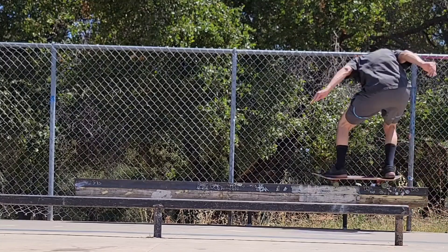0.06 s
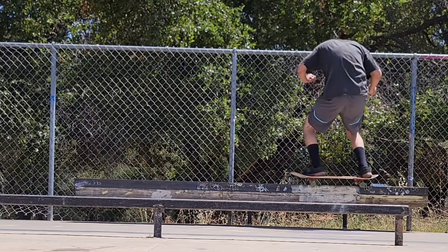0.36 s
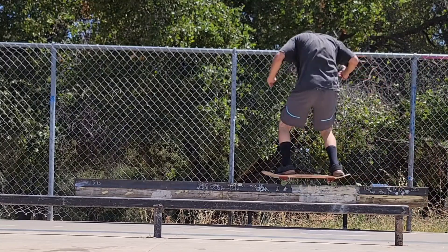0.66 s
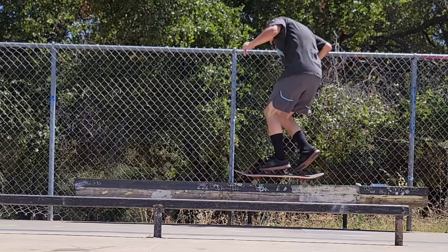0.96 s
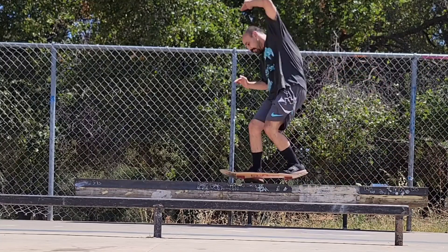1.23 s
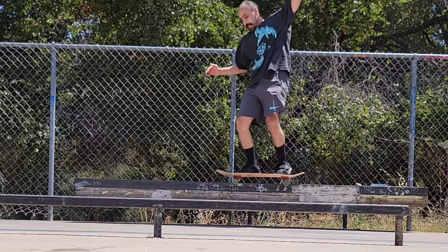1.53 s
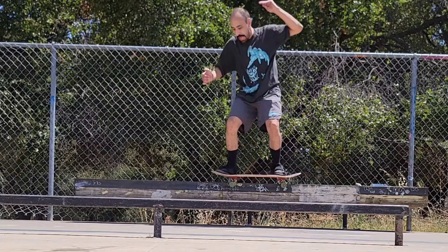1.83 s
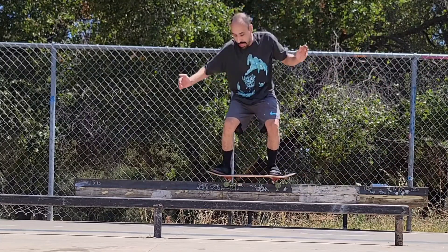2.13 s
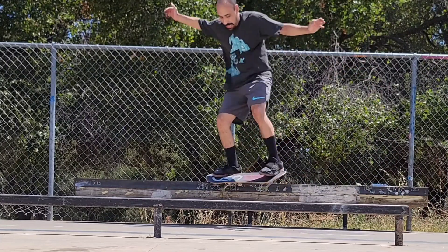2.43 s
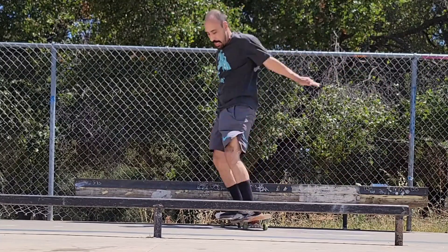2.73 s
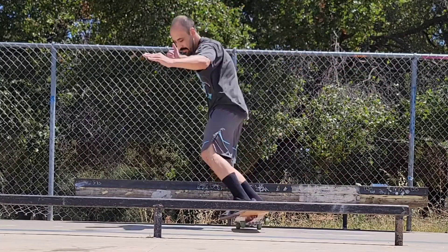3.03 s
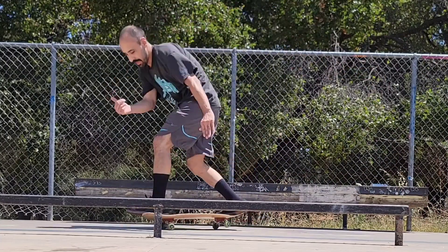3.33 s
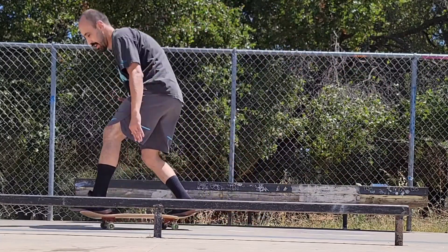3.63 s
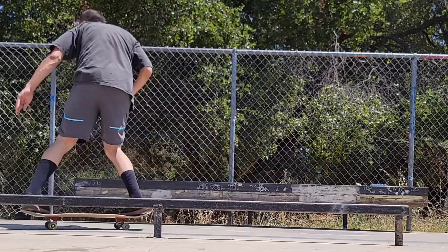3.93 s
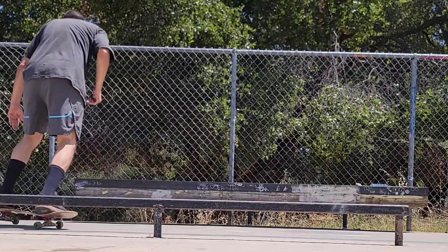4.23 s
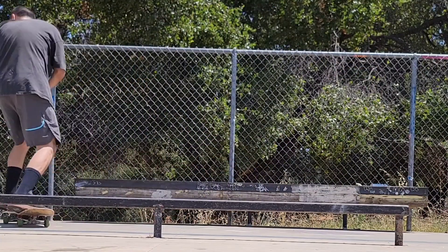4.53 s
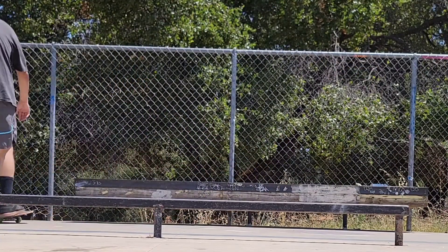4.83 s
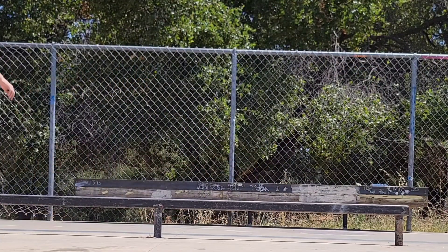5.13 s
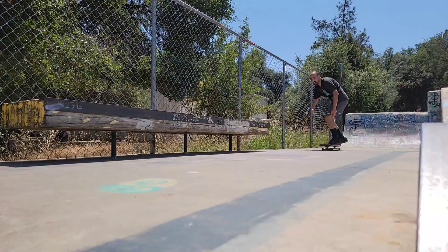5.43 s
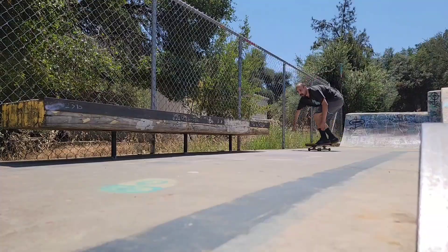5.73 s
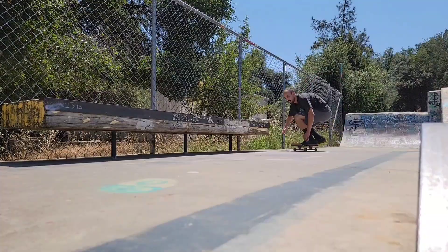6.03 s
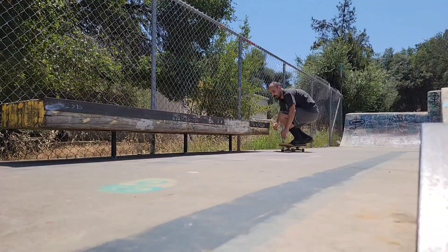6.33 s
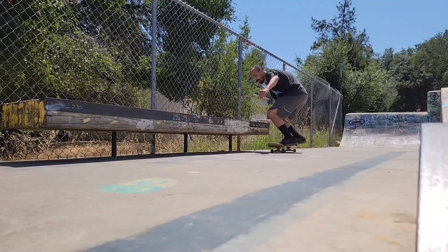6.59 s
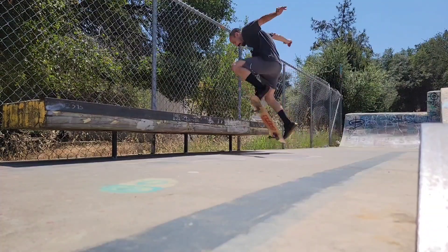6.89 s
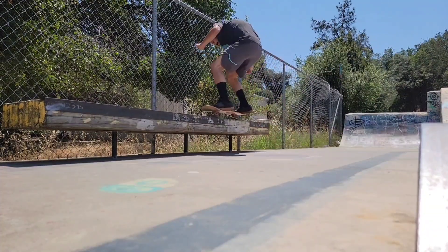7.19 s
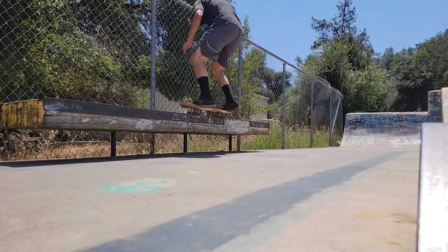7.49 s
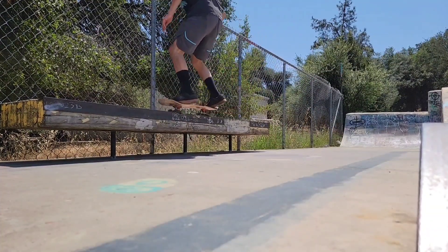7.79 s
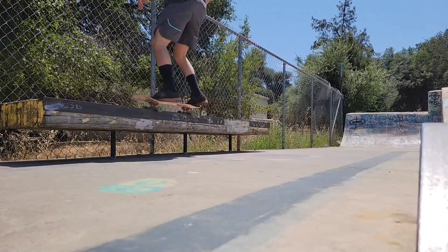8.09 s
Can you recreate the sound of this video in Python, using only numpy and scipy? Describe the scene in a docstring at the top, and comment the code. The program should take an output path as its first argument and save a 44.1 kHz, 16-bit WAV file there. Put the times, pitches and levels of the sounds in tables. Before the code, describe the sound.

A skateboard hits a steel rail with a sharp, ringing clack right at the start. Until about 2.4 seconds it balances there, with scattered knocks of wood and metal, short scrapes and a faint shoe squeak near 2 seconds. The tail slaps dryly around 2.5 seconds and the board clatters loudly onto concrete at 2.6. The wheels roll off to the left until about 5.3 seconds, their rumble turning raspier in the turns, with a few light knocks. From 5.4 seconds wheels roll up again, fairly quietly. The tail pops sharply at 6.8, and at 7 seconds the board lands on the rail with loud clacks and a hollow boom. It slides roughly along the steel toward the microphone, with a knock at 7.8 and more clacks just after 8 seconds. The open skatepark gives the hits a short, dull echo over a faint, steady low rumble.

```python
"""First a skateboarder balances on a steel rail: knocks and scrapes ring the wooden deck and the steel,
and a shoe squeaks. Next the tail slaps with a dry clack, he drops to the concrete and rolls off to the
left, the wheels' rumble brightening as he leans into turns. Then the scene changes: wheels roll up to
the rail, he pops the tail, lands with a boom and slides along the steel towards the microphone.
All along, hard blows clack, soft ones thump, and the open park answers briefly over its low rumble."""
import sys
import numpy as np
from scipy import signal
from scipy.fft import rfft, irfft, next_fast_len
from scipy.io import wavfile
from scipy.ndimage import map_coordinates

SR = 44100
rng = np.random.default_rng(int(sys.argv[2]) if len(sys.argv) > 2 else 0)


def output_pcm(signal):
    """Save a mono or channel-first signal as 16-bit PCM at the path in sys.argv[1].

    Samples are clipped to [-1, 1] before scaling.
    """
    pcm = np.clip(np.atleast_2d(signal).T, -1, 1) * 32767
    wavfile.write(sys.argv[1], SR, np.round(pcm).astype(np.int16))


N = 359415
RING_SIZE = SR // 2  # samples in one short sound
TIME, RING_TIME = np.arange(N) / SR, np.arange(RING_SIZE) / SR

# Blows of tail, trucks (axles) and wheels; t60 is the time a sound takes to fall by 60 dB:
# t/s, strength/dB, hardness/dB, grit/dB, rattle t60/s, thump f/Hz, knock f/Hz, clack f/Hz
BLOWS = [(0.0227, -16, 8.5, -16, 0.17, 303, 600, 3430), (0.042, -27, -10.5, -9, 0.035, 210.5, 504, 3480),
         (0.102, -29.5, 1, -29, 0.056, 174, 1170, 1610), (0.879, -34, 5.5, -27, 0.12, 177, 580, 1850),
         (0.919, -32.5, 10, -26, 0.2, 173, 1120, 2830), (0.925, -53, -14, -25, 0.05, 159, 500, 3450),
         (1.055, -32, -5, -24, 0.094, 300, 525, 3460), (1.096, -39.5, 2.5, -30, 0.018, 128, 592, 1710),
         (1.164, -50.5, 7, -13, 0.026, 200, 600, 4330), (1.635, -30.5, -2.5, -27, 0.11, 176, 547, 3500),
         (1.899, -39, 1.5, -42, 0.097, 164, 550, 3360), (2.255, -47.5, -13, -29, 0.044, 178, 550, 3450),
         (2.587, -31.5, 8.5, -40, 0.033, 169, 670, 2490), (2.599, -17, 3.5, -28, 0.03, 170, 750, 2030),
         (2.611, -27.5, -1, -19, 0.041, 200, 754, 1700), (2.6193, -20.5, -2, -21, 0.1, 234, 726, 1720),
         (2.652, -23, -1.5, -15.5, 0.097, 298, 490, 3200), (2.657, -15.5, -3, -22.5, 0.065, 238, 720, 1800),
         (2.682, -26.5, -5.5, -20, 0.033, 230, 594, 1750), (2.731, -38.5, -4.5, -40, 0.023, 200, 970, 1720),
         (2.933, -35, -1.5, -18, 0.079, 293, 815, 1770), (3.103, -29.5, 2, -10, 0.11, 290, 770, 2100),
         (3.445, -59.5, 4.5, -8.5, 0.02, 250, 800, 3620), (4.249, -38.5, 0, -14, 0.024, 213, 656, 1900),
         (5.029, -35, -4.5, -33.5, 0.021, 130, 554, 3140), (6.811, -31, -7, -18, 0.075, 211, 710, 1900),
         (6.993, -21, -3, -21, 0.048, 208, 830, 1680), (7.0117, -16, -6, -19, 0.09, 235, 480, 1770),
         (7.031, -15.5, 1.5, -7.5, 0.16, 240, 702, 1670), (7.058, -14.5, 1, -18.5, 0.055, 256, 980, 1920),
         (7.2373, -31, -0.5, -19.5, 0.073, 219, 1080, 4150), (7.803, -26.5, 2, -17, 0.1, 230, 1070, 3550),
         (8.058, -26, 2, -10.5, 0.14, 206, 794, 4100), (8.065, -21.5, 1.5, -13.5, 0.049, 201, 1125, 4150),
         (8.088, -30, -5, -30, 0.048, 167, 1050, 3700)]
# Slaps of the tail: t/s, level/dB, knock f/Hz, clack f/Hz, top f/Hz, crack compared with wood/dB
TAIL_POPS = [(2.44, -24, 626, 2070, 3700, -38), (2.5404, -22, 1070, 1600, 2400, -34),
             (6.803, -13, 1080, 2160, 4350, -21)]
# Skids of deck, wheels and shoes: t/s, strength/dB, hardness/dB, grit/dB, length/s
SCRAPES = [(1.384, -62, 2.5, -20, 0.091), (1.584, -40.5, 3, -28.5, 0.083), (1.698, -48.5, -3, -26, 0.026),
           (2.221, -47.5, 1, -30, 0.051), (2.277, -44, 0, -25.5, 0.049), (2.332, -52, 4, -25, 0.051),
           (2.487, -44.5, 1.5, -23, 0.074), (2.546, -33, 3, -26, 0.052), (2.959, -54.5, 7, -14.5, 0.16),
           (3.106, -34, 2, -12.5, 0.028), (3.279, -60.5, 5.5, -9.5, 0.081), (4.197, -35, 3, -8, 0.017),
           (4.222, -36.5, 3, -11.5, 0.031), (4.962, -37, 3, -13.5, 0.018)]
# Resonances (favourite pitches) of the deck with the rider on it: f/Hz, width/Hz, level/dB
DECK_RESONANCES = [(213.7, 17, 15.5), (294, 250, 5), (1050, 380, -3), (1328, 47, 0.5), (1835, 210, -5.5),
                   (2150, 640, 7), (2810, 370, 7.5)]
# Pitch ranges of thump, knock, clack and grit: low f/Hz, high f/Hz
PITCH_RANGES = [(85, 380), (420, 1480), (1500, 4200), (5400, 16000)]
# Ringing tones of the steel rail: f/Hz, level/dB, t60/s
RAIL_TONES = [(186, -12, 0.24), (237, -17.5, 0.32), (361.6, -13, 0.11), (545, -14, 0.091),
              (701, -5.5, 0.052), (748, -12, 0.13), (1071, -10.5, 0.088), (1123, -12.5, 0.15),
              (1232, -14, 0.11), (1426, -9.5, 0.05), (2810, -0.5, 0.096), (3260, -5.5, 0.13),
              (3440, -4.5, 0.19), (3542, -5, 0.17), (3720, -9, 0.18), (4165, -1.5, 0.12), (4440, -8, 0.079),
              (4920, -2.5, 0.079), (5360, -4.5, 0.1), (5900, -14.5, 0.12), (7400, -9, 0.2),
              (9200, -14, 0.25)]
# Deepest tones of the rail: f/Hz, level/dB, t60/s
BOOM_TONES = [(63.2, -21, 0.39), (93.9, -14.5, 0.37), (122, -27, 0.19), (170.6, -28, 0.51),
              (230, -46, 0.87)]
# Resonances of a shoe twisting on the deck: f/Hz, width/Hz, level/dB
SQUEAK_RESONANCES = [(1830, 230, -1), (2900, 540, -0.5), (3780, 130, 2), (9800, 120, -21)]
# Rumble as the board's pressure shifts on the rail: t/s, level/dB
BALANCING_LEVELS = [(0.2, -49), (0.64, -54), (1.02, -47), (1.21, -55.5), (1.35, -66), (1.81, -53),
                    (2.01, -60.5), (2.28, -54), (2.42, -49.5)]
# Tone colour of balancing on the rail: f/Hz, level/dB
BALANCING_COLOUR = [(88, -31), (150, -8), (205, -1.5), (245, -26), (290, -14), (534, -14), (854, -19.5),
                    (1250, -24), (1760, -29), (2500, -30), (3490, -26.5), (5050, -39.5), (16000, -58.5)]
# Tone colour of rolling away: f/Hz, level/dB
AWAY_COLOUR = [(60, -16), (105, 8.5), (150, -5.5), (197, -4.5), (422, -12.5), (500, -3.5), (578, -9.5),
               (750, -9), (1300, -13.5), (2270, -15), (3300, -11.5), (4500, -16), (6640, -25), (8230, -44),
               (10000, -39.5), (16000, -53)]
# Tone colour of rolling up to the rail: f/Hz, level/dB
APPROACH_COLOUR = [(88, -8.5), (150, 1), (205, -24), (270, -5), (360, -13.5), (660, -1), (854, -8),
                   (1130, -5.5), (1790, -8), (2400, -13.5), (3100, -9), (5050, -27.5), (6510, -21.5),
                   (8230, -24.5), (16000, -46)]
# Tone colour of sliding along the rail: f/Hz, level/dB
SLIDE_COLOUR = [(88, -30), (150, -3.5), (226, 6.5), (280, -4.5), (376, -1.5), (504, -8.5), (740, -4),
                (1150, -8), (1830, -25.5), (4240, -39), (8230, -45.5), (16000, -63)]
# The rider leans and the board scrubs sideways: peak t/s, half-length/s, swell/dB
SCRUBS = [(0.787, 0.096, 4.5), (1.172, 0.076, 9), (1.576, 0.061, 17), (2.824, 0.16, 9.5), (3.033, 0.19, 18),
          (3.34, 0.089, 10.5), (3.837, 0.44, 15.5), (4.08, 0.098, 8.5), (4.576, 0.11, 10.5),
          (4.774, 0.22, 16), (6.656, 0.07, 12), (6.828, 0.063, 20), (7.39, 0.05, 5.5), (7.687, 0.12, 10),
          (7.869, 0.089, 16), (8.093, 0.091, 23)]
# Tone colour of the park's rumble: f/Hz, level/dB
PARK_COLOUR = [(20, -10.5), (35, -8.5), (55, 4), (80, -2.5), (110, 1.5), (160, -5.5), (300, -16),
               (1000, -21.5), (16000, -67)]
# How much later the board's sound reaches the right channel: t/s, delay/ms
RIGHT_DELAY = [(0, -0.14), (1.9, 0.0036), (3.1, -0.016), (4.2, 0.24), (5.3, 0.32), (5.45, -0.12),
               (8.1, 0.14)]
# How much louder the microphone's left channel is than its right: f/Hz, level/dB
LEFT_OVER_RIGHT = [(100, 0), (250, .6), (1200, 2), (2200, .8), (4200, -1.5), (6000, 1), (8000, 7),
                   (11000, 12)]
# Tone colour that both channels share: f/Hz, level/dB
MICROPHONE_COLOUR = [(6800, -1.5), (8300, -7), (9600, 0), (14000, 5.5)]

TOP_HZ = 16000
HOP_OFF_S, HOP_ON_S = 2.42, 7.0  # the board leaves the rail; it lands on the rail
# Resonances that a blow picks out by where it lands: width/Hz, level/dB
THUMP_ON_STEEL, THUMP_ON_CONCRETE = (17.6, 23.2), (113, 13.6)
KNOCK, CLACK = (155, 14.7), (830, 3.3)
SCRUB_SHARES = (0.44, 0.96, 1.095)  # how strongly rumble, rasp and hiss follow a swell


def blows(snap_db=-8, rattle_db=0.5, weight=0.94, push_s=0.0024, ring_db=4, clang_db=-17, span_s=0.013):
    """Each blow is a snap, the push of the rider's weight and a dying rattle of trucks and wheels."""
    out = np.zeros((2, N))
    push = np.sin(np.pi * np.minimum(RING_TIME / push_s, 1)) ** 2
    for s, strength_db, hardness_db, grit_db, t60, thump_hz, knock_hz, clack_hz in BLOWS:
        rattle = stereo_noise(RING_SIZE, apart_hz=3000) * fade(t60)
        rattle *= gain(rattle_db * wander(RING_SIZE, 700))
        force = unit_energy(rattle) + weight * push / push.sum()
        force[:, 0] += gain(snap_db)
        ring_share = 0.56 if s > HOP_ON_S else 1  # the sliding board cuts the ring short
        steel = rail(clack_hz, ring_share) if on_rail(s) else 0
        thump = THUMP_ON_STEEL if on_rail(s) else THUMP_ON_CONCRETE
        spot = [(thump_hz, *thump), (knock_hz, *KNOCK), (clack_hz, *CLACK)]
        levels_db = contact_levels(s, strength_db, hardness_db, grit_db)
        add(out, s, deck(force, gain(ring_db) * steel, spot, levels_db, span_s))
        if on_rail(s):  # the harder the blow, the more the steel clangs
            clang = band(steel, 4230, 6450, order=5)
            clang /= rms(clang[:, :int(span_s * SR)])
            add(out, s, gain(strength_db + hardness_db + clang_db) * clang)
    return out


def deck(force, steel, spot, levels_db, span_s, direct_db=-10):
    """A force rings the wooden deck and the spot it touches; any ring of the steel joins in."""
    body = steel + gain(direct_db) * force
    body += sum(gain(db) * resonance(force, hz, width) for hz, width, db in [*DECK_RESONANCES, *spot])
    out = 0
    for (lo, hi), db in zip(PITCH_RANGES, levels_db):  # each level holds for the first span_s
        part = band(body, lo, hi, order=4 if hi > 2000 else 3)
        out += gain(db) * part / rms(part.mean(axis=0)[:int(span_s * SR)])
    return out


def contact_levels(s, strength_db, hardness_db, grit_db, hollow_db=5.5):
    """Hard contacts clack, middling ones knock, soft ones thump; the hollow rail adds thump."""
    thump_db = -5 - hardness_db + on_rail(s) * hollow_db
    knock_db = 4.5 - 0.64 * abs(hardness_db)
    clack_db = -5.5 + hardness_db
    return strength_db + np.array([thump_db, knock_db, clack_db, grit_db])


def rail(favoured_hz, ring_share=1, detune=0.00254, favour_db=7, favour_octaves=0.13, apart_hz=2000):
    """One tap rings the steel: main tones, nudged in pitch by the load, and many weak overtones."""
    ring = 0
    clock = np.cumsum(1 + 0.0042 * wander(RING_SIZE, 160)) / SR  # truck chatter makes the ring waver
    for hz, db, t60 in RAIL_TONES:
        phase, offset = rng.uniform(-np.pi, np.pi, 2)
        # the whole rail gives off sound, so high tones reach left and right out of step
        phases = phase + np.array([[0], [offset * min(hz / apart_hz, 1) / 2]])
        loaded_hz = hz * (1 + detune * rng.standard_normal())
        # each spot on the rail favours the tones around one pitch
        boost_db = favour_db * np.exp(-(np.log2(hz / favoured_hz) / favour_octaves) ** 2)
        strength = gain(db + boost_db + 2.0 * rng.standard_normal())
        ring += strength * fade(ring_share * t60) * np.sin(2 * np.pi * loaded_hz * clock + phases)
    spectrum = rfft(stereo_noise(RING_SIZE, apart_hz))
    chosen = rng.random(RING_SIZE // 2 + 1) < SR / RING_SIZE / 90  # about one overtone per 90 Hz
    overtones = irfft(spectrum * chosen, RING_SIZE)
    shimmer = band(overtones, 2200, 7000, order=2) * fade(ring_share * 0.28)
    return unit_energy(unit_energy(ring) + gain(-7) * unit_energy(shimmer))


def tail_pops(t60=0.026, snap_db=-3, knock_db=3, direct_db=-9, span_s=0.0098):
    """The bare wooden tail slaps down with a dry clack and a brief crack."""
    out, span = np.zeros((2, N)), int(span_s * SR)
    for s, level_db, knock_hz, clack_hz, top_hz, crack_db in TAIL_POPS:
        force = unit_energy(stereo_noise(RING_SIZE, apart_hz=3000) * fade(t60))
        force[:, 0] += gain(snap_db)
        knock = gain(knock_db) * resonance(force, knock_hz, width_hz=170)
        clack = resonance(force, clack_hz, width_hz=1000)
        # the time the tail stays in contact limits the highest pitch
        wood = band(knock + clack + gain(direct_db) * force, 420, top_hz, order=7)
        wood /= rms(wood[:, :span])
        crack = band(force * fade(t60), 4100, 6450, order=2)
        crack /= rms(crack[:, :span])
        add(out, s, gain(level_db) * (wood + gain(crack_db) * crack))
    return out


def rail_boom(start_s=7.013, attack_s=0.06):
    """The rider's full weight sets the hollow rail booming on its legs."""
    out = np.zeros((2, N))
    sway = sum(gain(db) * fade(t60) * np.sin(2 * np.pi * hz * RING_TIME) for hz, db, t60 in BOOM_TONES)
    add(out, start_s, np.array([sway, sway]) * np.minimum(RING_TIME / attack_s, 1))
    return out


def scrapes(slip_db=2.0, slip_rate=600, rise_share=0.33, release_s=0.057, ring_db=-10, ring_hz=3450):
    """A skid sticks and slips: pressure rises, sags and lets go, and the deck answers hollowly."""
    out = np.zeros((2, N))
    hollow_knock = (590, 85, 10)  # f/Hz, width/Hz, level/dB
    for s, strength_db, hardness_db, grit_db, length in SCRAPES:
        stages_s = [0, rise_share * length, length, length + release_s, .5]
        pressure_db = np.interp(RING_TIME, stages_s, [-14, 0, -3, -60, -200])
        force = stereo_noise(RING_SIZE) * gain(pressure_db + slip_db * wander(RING_SIZE, slip_rate))
        steel = gain(ring_db) * excite(force, rail(ring_hz)) if on_rail(s) else 0
        levels_db = contact_levels(s, strength_db, hardness_db, grit_db)
        add(out, s, deck(force, steel, [hollow_knock], levels_db, span_s=length))
    return out


def riding(levels, spectrum, rasp_db, hiss_db, grain_db, grit_db, ring_db=None, ring_hz=None):
    """A rough surface shakes the board, and any rail under it; pressure and scrubbing brighten it."""
    s, rumble_db = np.transpose(levels)
    edge_s = 0.061  # fade in and out
    start = max(int((s[0] - edge_s) * SR), 0)
    t = TIME[start:int((s[-1] + edge_s) * SR)]
    force = roughness(len(t)) * grit(len(t), grit_db)
    force *= gain(grain_db * wander(len(t), 260) + 0.7 * wander(len(t), 28.35))  # fast grain, slow sway
    if ring_db is not None:
        force += gain(ring_db) * grind(force, ring_hz)
    sound, out = colour(force, spectrum), np.zeros((2, N))
    pressure_db = np.interp(t, s, rumble_db)
    touching = np.clip(np.minimum(t - s[0], s[-1] - t) / edge_s + 1, 0, 1)
    scrub_db = sum(db * np.exp(-((t - peak_s) / half_s) ** 2) for peak_s, half_s, db in SCRUBS)
    swell_db = 0.61 * (pressure_db - pressure_db.mean()) + scrub_db
    ranges_hz = [(90, 1770), (2000, 9800), (7500, TOP_HZ)]  # rumble, rasp, hiss
    for (lo, hi), db, share in zip(ranges_hz, [0, rasp_db, hiss_db], SCRUB_SHARES):
        part = band(sound, lo, hi)
        loudness = touching * gain(pressure_db + db + share * swell_db)
        add(out, t[0], loudness * part / rms(part.mean(axis=0)))
    return out


def coast(span_s, start_db, db_per_s):
    """The rumble changes evenly as the board leaves, nears or slows: rows of t/s, level/dB."""
    return [(s, start_db + db_per_s * (s - span_s[0])) for s in span_s]


def roughness(size, drift_db=1.25, drift_rate=14):
    """Tiny bumps pass under the board: each half octave of noise swells and fades on its own."""
    edges = np.geomspace(60, TOP_HZ, 17)
    return sum(band(stereo_noise(size), lo, hi, order=2) * gain(drift_db * wander(size, drift_rate))
               for lo, hi in zip(edges, edges[1:]))


def grit(size, surge_db, per_s=14, t60=0.037):
    """Loose grains are crushed now and then, and each makes the force surge briefly."""
    chance, strength = rng.random((2, size))
    cracks = (chance < per_s / SR) * strength ** 2 * gain(surge_db)
    return 1 + signal.fftconvolve(cracks, fade(t60))[:size]


def grind(force, ring_hz, shift_db=5, shift_rate=11, spots=2):
    """The truck muffles the rail and shifts from spot to spot, so the ring comes and goes."""
    out = 0
    for _ in range(spots):
        contact = gain(shift_db * wander(force.shape[1], shift_rate))
        out += contact * excite(force, rail(ring_hz, ring_share=0.43, detune=0.0077))
    return out / spots


def shoe_squeak(start_s=2.035, length_s=0.13, level_db=-48.5, slip_db=1.5, slip_rate=500):
    """A rubber sole twists on the deck: a short, rough squeak swells and fades."""
    out, size = np.zeros((2, N)), int(length_s * SR)
    force = stereo_noise(size) * gain(slip_db * wander(size, slip_rate))
    sound = sum(gain(db) * resonance(resonance(force, hz, width), hz, 4 * width)
                for hz, width, db in SQUEAK_RESONANCES)
    add(out, start_s, gain(level_db) * np.hanning(size) * sound / rms(sound))
    return out


def park_echo(x, level_db=-18.5, t60=0.37, delay_s=0.0046):
    """Ramps, fence and trees scatter the sound into a short, dull echo."""
    scatter = band(stereo_noise(RING_SIZE, apart_hz=495), 100, 7000, order=1)
    echo = scatter * fade(t60) * (RING_TIME > delay_s)
    return gain(level_db) * excite(x, unit_energy(echo))


def park_rumble(level_db=-50.5, swell_db=0.37):
    """A distant rumble that swells a little."""
    rumble = colour(stereo_noise(N, apart_hz=450), PARK_COLOUR)
    return rumble / rms(rumble) * gain(level_db + swell_db * wander(N, 4.9))


def on_rail(s):
    """Whether the board touches the steel at time s."""
    return s < HOP_OFF_S or s > HOP_ON_S


def gain(db):
    """Turn decibels into a number to multiply by."""
    return 10 ** (np.asarray(db) / 20)


def rms(x):
    """Average strength of a sound (root mean square)."""
    return np.sqrt(np.mean(x ** 2) + 1e-18)


def unit_energy(x):
    """Scale a sound to an average energy of one per channel."""
    return x / (rms(x) * np.sqrt(x.shape[-1]))


def band(x, lo_hz, hi_hz, order=3):
    """Keep the pitches between two limits."""
    sos = signal.butter(order, [lo_hz, min(hi_hz, SR / 2 - 1)], "band", fs=SR, output="sos")
    return signal.sosfilt(sos, x)


def resonance(x, hz, width_hz):
    """Ring around one pitch; narrower rings longer."""
    return signal.lfilter(*signal.iirpeak(hz, hz / width_hz, fs=SR), x)


def excite(x, ring):
    """Let every sample of x set off its own copy of a ring or echo."""
    return signal.fftconvolve(x, ring, axes=1)[:, :x.shape[1]]


def colour(x, points):
    """Turn pitches up or down along a curve of f/Hz, level/dB."""
    hz, db = np.transpose(points)
    size = next_fast_len(x.shape[-1] + SR // 10)
    bins_hz = np.maximum(np.fft.rfftfreq(size, 1 / SR), 1)
    curve_db = np.interp(np.log(bins_hz), np.log(hz), db)
    return irfft(rfft(x, size) * gain(curve_db), size)[..., :x.shape[-1]]


def wander(size, rate):
    """Glide between random values with a spread near 1, rate times a second."""
    steps = np.arange(size) * rate / SR
    return np.interp(steps, np.arange(size // 10), rng.standard_normal(size // 10))


def stereo_noise(size, apart_hz=4200):
    """Noise at two close points: alike below apart_hz, unrelated above."""
    mid, side = rng.standard_normal((2, size))
    side = signal.sosfilt(signal.butter(1, apart_hz, "high", fs=SR, output="sos"), side)
    return np.array([mid + side, mid - side])


def fade(t60):
    """Die away by 60 dB every t60 seconds."""
    return np.exp(-np.log(1000) * RING_TIME / max(t60, 1e-3)) + 1e-12


def add(out, s, sound):
    """Mix a sound in at time s."""
    start = max(int(s * SR), 0)
    out[:, start:start + sound.shape[1]] += sound[:, :N - start]


def scene():
    """The board crosses in front of the microphone, with the park around it."""
    hits = blows() + tail_pops() + scrapes()
    skate = hits + rail_boom() + shoe_squeak()
    skate += riding(BALANCING_LEVELS, BALANCING_COLOUR,
                    rasp_db=-10, hiss_db=-29.5, grain_db=1.5, grit_db=4, ring_db=-6, ring_hz=3400)
    skate += riding(coast(span_s=(2.7, 5.35), start_db=-56.5, db_per_s=1.58), AWAY_COLOUR,
                    rasp_db=-20, hiss_db=-31.5, grain_db=1.74, grit_db=-3.5)
    skate += riding(coast(span_s=(5.4, 6.95), start_db=-52.5, db_per_s=0.5), APPROACH_COLOUR,
                    rasp_db=-8.5, hiss_db=-21, grain_db=0.5, grit_db=1.5)
    skate += riding(coast(span_s=(7.15, 8.15), start_db=-42.5, db_per_s=-12.5), SLIDE_COLOUR,
                    rasp_db=-15, hiss_db=-28, grain_db=2.5, grit_db=-2, ring_db=-12.5, ring_hz=4140)
    delay_samples = np.interp(TIME, *np.transpose(RIGHT_DELAY)) * SR / 1000
    right = map_coordinates(skate[1], [np.arange(N) - delay_samples], order=3)
    return np.array([skate[0], right]) + park_echo(hits) + park_rumble()


def record(dry, ceiling=1.0):
    """The microphone colours the treble (duller on the right), rounds peaks and cuts the very top."""
    hz, db = np.transpose(LEFT_OVER_RIGHT)
    left_db = 20 * np.log10(2 / (1 + gain(-db)))
    left = colour(dry[0], np.c_[hz, left_db])
    right = colour(dry[1], np.c_[hz, left_db - db])
    stereo = colour(np.array([left, right]), MICROPHONE_COLOUR)
    rounded = stereo / (1 + (stereo / ceiling) ** 6) ** (1 / 6)
    return signal.sosfilt(signal.ellip(8, .2, 70, TOP_HZ, fs=SR, output="sos"), rounded)


dry = scene()
out = record(dry)
output_pcm(out)
```